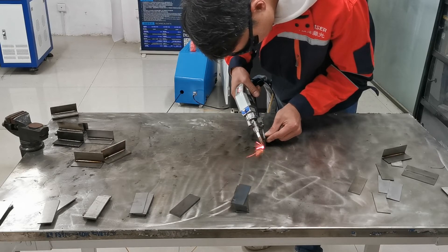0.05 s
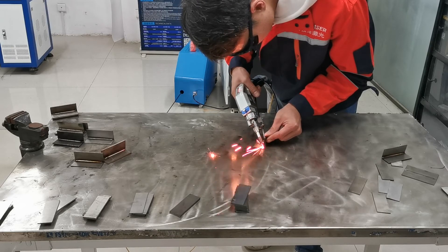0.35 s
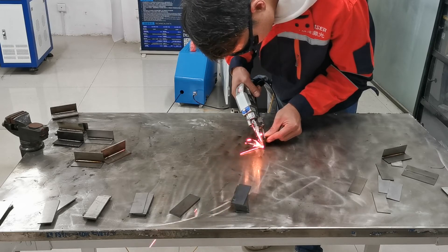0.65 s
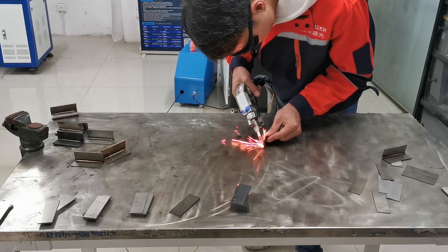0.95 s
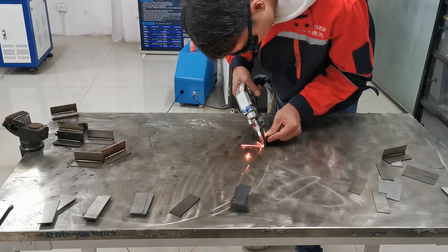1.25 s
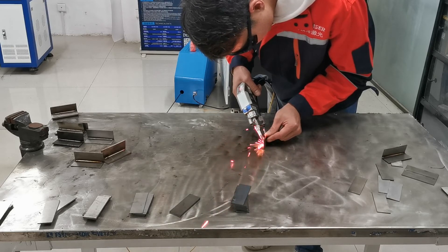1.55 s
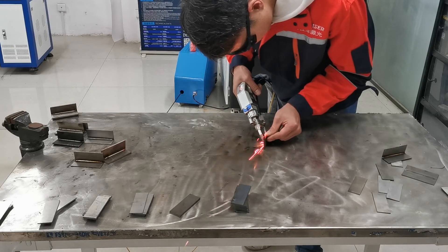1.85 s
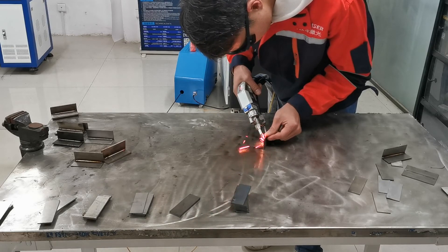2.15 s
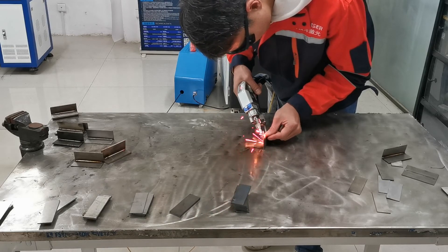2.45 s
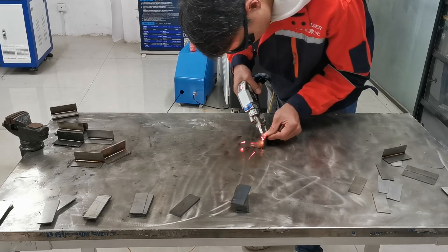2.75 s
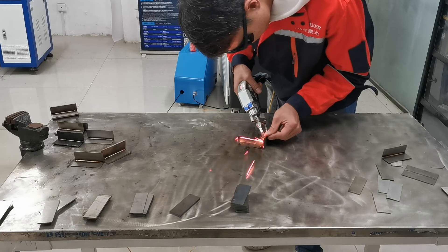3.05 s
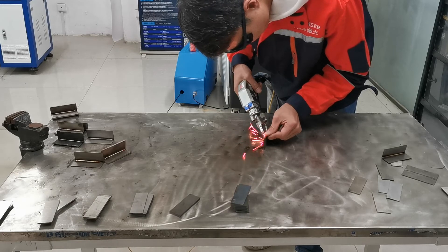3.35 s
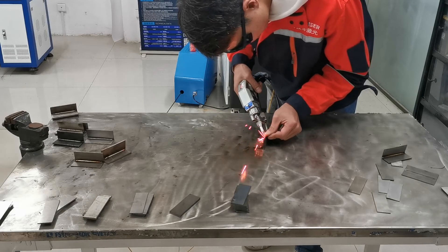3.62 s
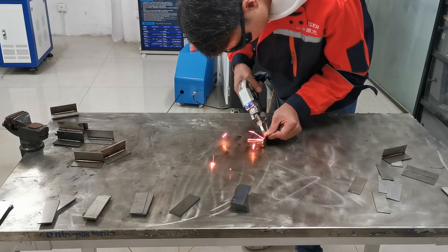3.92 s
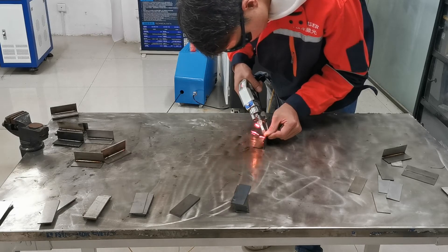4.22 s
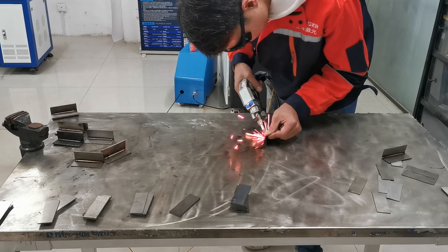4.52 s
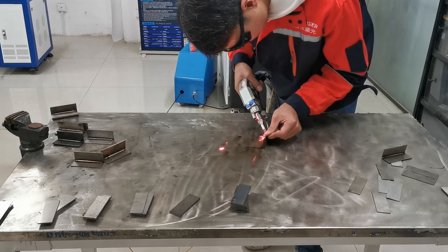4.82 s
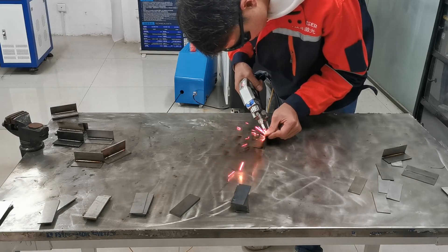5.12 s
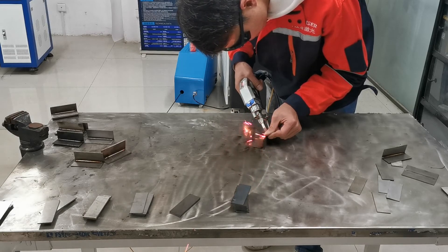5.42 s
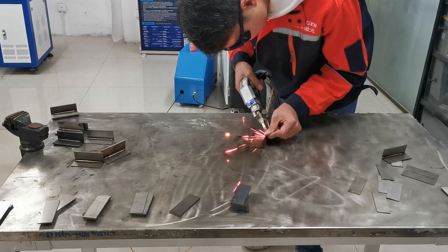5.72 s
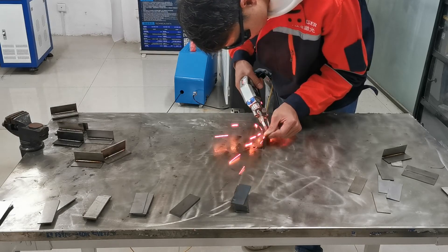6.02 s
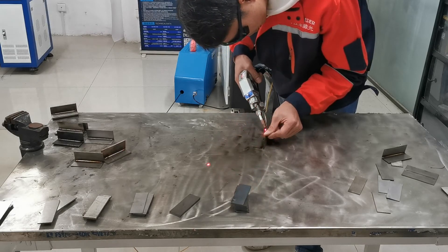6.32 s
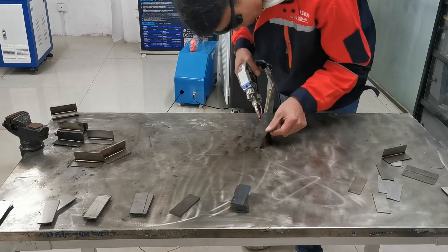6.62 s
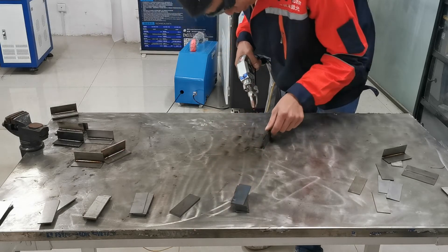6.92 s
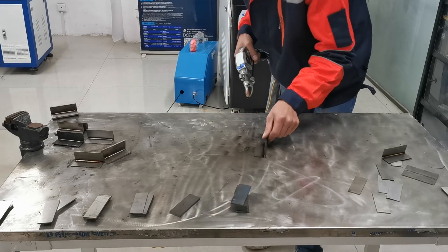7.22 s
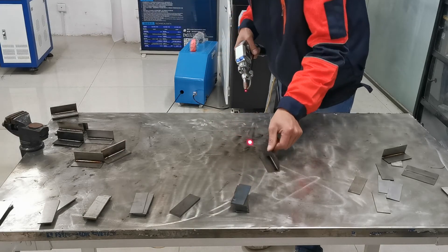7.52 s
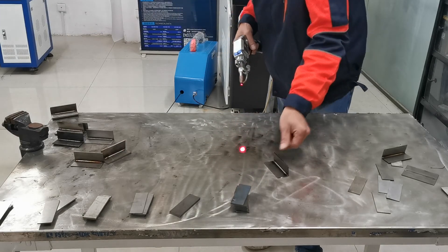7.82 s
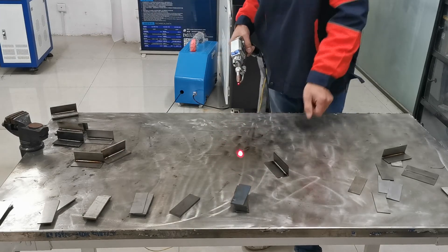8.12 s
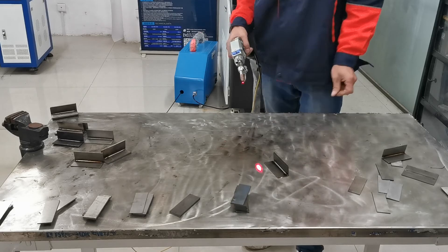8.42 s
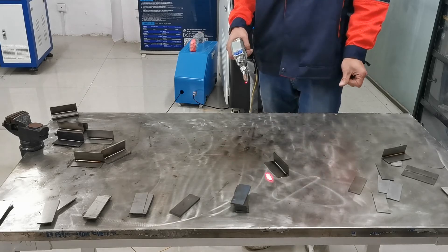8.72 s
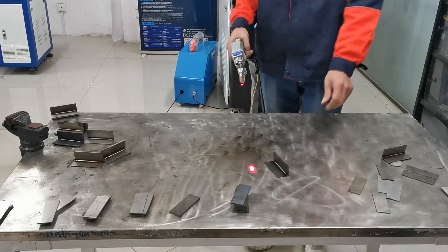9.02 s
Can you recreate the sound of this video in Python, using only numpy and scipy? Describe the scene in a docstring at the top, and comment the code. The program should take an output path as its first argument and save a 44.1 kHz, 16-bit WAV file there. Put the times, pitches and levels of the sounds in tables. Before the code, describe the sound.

Close by in a humming workshop, a laser welding torch gives a bright, rapidly throbbing hiss with a high whine for roughly six seconds. It cuts off with a quick falling chirp, a short breath of gas and a soft scuff. The welded piece scrapes and clinks briefly across a steel bench, then light ticks and faint cloth rustling leave only the hum of machines and fans.

```python
"""Machines hum in a tiled workshop while a handheld laser welder runs a seam on a steel bench.
The beam is pulsed 3000 times a second and swept across the seam: the vapour jet whines, hisses,
throbs and spits. At 5.9 s the beam stops and the whine slides down; shielding gas flows on briefly,
and the torch lifts with a soft scuff and a low rumble. Around 7 s the welded piece is dragged over
the bench, catching and ringing. Last, metal ticks and a sleeve rustles over the hum."""
import sys
import numpy as np
from scipy import signal
from scipy.fft import rfft, irfft, next_fast_len
from scipy.io import wavfile
from scipy.ndimage import uniform_filter1d

SR = 44100
rng = np.random.default_rng(int(sys.argv[2]) if len(sys.argv) > 2 else 0)


def unload_wav(signal):
    """Save mono or channel-first audio to the path in sys.argv[1] as 16-bit WAV at rate SR, clipped to [-1, 1]."""
    wavfile.write(
        sys.argv[1],
        SR,
        np.round(np.clip(np.atleast_2d(signal).T, -1, 1) * 32767).astype(np.int16),
    )


N = 399546
TIME = np.arange(N) / SR
PADDED = next_fast_len(N, True)
BIN_HZ = np.maximum(np.arange(PADDED // 2 + 1) * SR / PADDED, 1)
PULSE_HZ, STOP_S, FALL_HZ_PER_S = 3000, 5.905, 15600   # the beam's pulse rate falls after switch-off

# mains hum and fan tones: (frequency [Hz], level [dB])
HUM_TONES = [(100.3, -51.5), (199.6, -52.5), (297.6, -60.5), (497.6, -63), (687, -65.5), (1067, -71.5),
             (172.6, -67), (563, -69.5), (925, -67)]
# two runs of a motor: (full at [s], held until [s], level [dB])
MOTOR_RUNS = [(1.95, 3.0, -45.5), (6.8, 7.7, -49)]
# tone colour of each noise layer: (frequency [Hz], relative spectral level [dB])
FAN_COLOUR = [(15, -11), (32, 4), (65, -11.5), (160, -9), (280, -14), (370, -16), (560, -15.5),
              (1000, -17.5), (1400, -20), (2300, -22.5), (3500, -35), (8000, -39), (15500, -50)]
RUMBLE_COLOUR = [(20, -7.5), (45, 3), (90, -1), (170, -2.5), (300, -8), (700, -29.5), (2000, -44),
                 (8000, -84)]
SLEEVE_COLOUR = [(1760, -29), (3000, -2), (4060, -10), (4350, -5), (8410, -9.5), (10100, -10), (15500, -17)]
SCUFF_COLOUR = [(120, -25), (280, -3), (680, 1), (900, -6), (3000, -33), (8000, -60)]
GAS_COLOUR = [(300, -16), (1100, -14), (1450, -7), (1680, 2.5), (1950, -7), (2900, -9), (3700, -16.5),
              (6000, -18), (10000, -18.5), (15500, -25)]
DRAG_COLOUR = [(180, -16), (300, -3), (343, -18), (493, -5), (632, -18), (759, -5), (973, -12.5),
               (1230, -6.5), (2800, -7), (3700, -10), (8100, -6), (10000, -10), (11500, -4), (13800, -7),
               (15800, -4.5)]
JET_COLOUR = [(350, -25), (680, -23), (1100, -22.5), (1480, -13.8), (1850, -16.5), (2400, -11.3),
              (3100, -9.5), (3290, -20), (3480, -11), (3750, -13), (4300, -8), (5600, -2), (6900, -3.2),
              (9700, -.8), (10100, -2.5), (10850, 2.5), (11600, -3), (12500, 1.3), (13400, 1),
              (14100, -3.7), (14900, -2), (15800, -10)]
# stereo width of room noise and of close hiss: (frequency [Hz], left-right correlation [-1 to 1])
ROOM_LIKENESS = [(130, 1), (290, 0.82), (640, 0.69), (1410, 0.0)]
CLOSE_LIKENESS = [(640, .98), (1410, 0.625), (3100, 0.49), (6820, 0.033), (15000, -0.01)]
# stereo placement: (frequency [Hz], left over right [dB])
ROOM_PAN = [(60, 9), (110, 2), (200, 6.5), (380, -1), (700, -9.5), (1290, -3), (2380, -4), (4400, 1),
            (8120, -1.5), (15000, -8.5)]
DRAG_PAN = [(200, 3.0), (380, -1), (700, -5), (1290, -3.5), (2380, -8), (4400, 3.5), (8120, -3.5),
            (15000, -11)]
JET_PAN = [(1000, -1.5), (1500, -4.5), (3500, 0.5), (7000, -2), (8000, -1), (9500, -6), (10900, -12.5),
           (11700, -5.5), (13000, -9), (14200, -1), (15800, -7)]

# sleeve swishes: (full at [s], held until [s], level [dB], attack [s], release [s])
SWISHES = [(7.79, 7.92, -67.5, .05, .9), (8.38, 8.48, -67, .6, .25), (8.62, 8.76, -70, .15, .9)]
# light touches of metal: (time [s], level [dB], pitch [Hz], bandwidth [Hz])
TICKS = [(7.795, -63, 3000, 3000), (7.985, -66, 6700, 900), (8.077, -61, 3000, 2600),
         (8.1, -66, 9600, 2000)]
# modes of bench and piece: (frequency [Hz], bandwidth [Hz], relative level [dB])
STEEL_MODES = [(460, 60, -4), (760, 39, 1.5), (900, 90, -2), (1293, 50, 3.5), (1635, 70, -.5),
               (1780, 70, 1), (1810, 830, -7), (2195, 110, -.5), (2480, 130, -2), (2720, 120, -5),
               (4430, 350, -13)]
# fader ride of the drag: (time [s], relative level [dB])
DRAG_EFFORT = [(6.88, -72), (6.954, -56), (7.048, -47), (7.32, -41.5), (7.44, -47.3), (7.52, -55),
               (7.576, -51), (7.696, -70), (7.72, -85)]
# the piece's edge catches: (time [s], knock drive [dB], chatter drive [dB], favoured pitch [Hz])
CATCHES = [(7.021, -39.5, -42.5, 1150), (7.033, -48, -50, 2500), (7.047, -45, -47, 780),
           (7.076, -41.5, -48, 780), (7.088, -38.5, -51, 1720), (7.215, -37.5, -49, 850),
           (7.228, -38.5, -51, 1900), (7.412, -40.5, -47, 900), (7.559, -55, -57.5, 2200)]

# the beam's sweep across the seam: (time [s], rate [Hz])
SWEEP_RATE = [(0, 43.3), (0.6, 44.2), (1.5, 44.4), (2.2, 44.9), (3, 44.63), (4.8, 44.65), (5.4, 44.3),
              (5.9, 43.4)]
# fader ride of the vapour jet's hiss: (time [s], relative level [dB])
JET_LEVEL = [(0.0, -27.7), (0.06, -24.7), (0.71, -25.3), (1.12, -27.1), (1.35, -25.9), (1.44, -28.0),
             (1.77, -27.1), (1.87, -28.9), (1.89, -27.1), (2.2, -25.9), (2.28, -27.1), (2.86, -27.7),
             (3.19, -27.1), (4.81, -28.3), (5.65, -26.5), (5.77, -28.3), (5.9, -26.5)]
# the hiss thins early, then fills out: (time [s], low band gain [dB], middle band gain [dB])
HISS_EQ = [(0, 2.0, 3.5), (.8, 2.0, 3.4), (1.25, .5, 2.4), (2.0, 1.4, 3.2), (3.2, 4.6, 3.9),
           (4.6, 4.9, 3.6), (5.4, 6.0, 3.9), (5.9, 6.6, 3.3)]
# tremolo that the sweep gives the hiss: (time [s], depth [0-1])
HISS_THROB = [(0, .03), (.85, .35), (2.8, .35), (4.5, .16), (5.2, .27), (5.9, .05)]
# reflections off hand, torch, chest and floor: (delay [s], gain [ratio], delay wander [s])
NEAR_ECHOES = [(.00075, .18, .00007), (.0013, .2, .00008), (.0047, .22, .00006), (.0083, .22, .00008)]
# nozzle gap resonances: (frequency [Hz], bandwidth [Hz], boost [dB], crest time [s], half width [s])
NOZZLE_MODES = [(10920, 520, 6.5, .5, 1.0), (12850, 170, 4.5, .3, .9), (13170, 280, 5, 2.5, 1.0),
                (10800, 700, 5.5, 2.7, .7), (7570, 230, 4.5, 4.9, .9), (10750, 700, 3.5, 4.6, 1.2),
                (4150, 700, 3.5, 1.9, 1.6)]
# whine harmonics along the seam: (time [s], relative level [dB], left over right [dB], left lead [rad])
WHINE_3K = [(0.0, -27.1, -1.8, -0.8), (0.1, -40.1, -4.8, -0.4), (0.9, -37.0, -5.1, 0.3),
            (1.1, -34.0, -4.9, 0.2), (1.4, -39.6, -0.9, 0.4), (1.6, -37.6, -1.1, 0.3),
            (2.0, -40.0, -1.3, 0.1), (2.4, -38.9, -3.4, -0.8), (3.4, -34.9, -7.4, -2.6),
            (4.0, -38.9, -5.7, -2.0), (5.5, -41.2, -3.3, -0.3), (5.9, -34.5, -4.5, 0.4)]
WHINE_6K = [(0.0, -29.2, 1.0, -0.1), (0.2, -26.3, 4.3, 0.0), (0.8, -30.2, 3.4, 0.3), (1.3, -29.3, 4.5, 0.2),
            (1.8, -34.3, 5.0, 0.9), (2.6, -37.1, 0.0, 0.1), (2.9, -42.7, -2.3, 0.3),
            (3.2, -33.7, -4.1, 0.2), (3.7, -32.1, 1.4, 0.8), (4.5, -36.2, -4.1, -0.5),
            (4.9, -36.3, -12.0, -1.4), (5.9, -29.8, -4.5, -0.1)]
WHINE_9K = [(0.0, -27.0, -10.2, -1.3), (0.1, -22.8, -11.0, -1.3), (1.1, -28.6, -6.2, -1.7),
            (1.3, -24.0, -8.9, -1.7), (1.4, -28.7, -3.8, -1.7), (2.2, -22.9, -9.9, -1.1),
            (2.3, -28.9, -6.0, -1.4), (3.05, -28.2, -7.2, -1.8), (3.5, -27.4, -6.2, -1.0),
            (3.8, -29.7, -4.6, 0.1), (4.4, -29.8, -4.3, 1.8), (4.8, -31.2, -5.0, 4.2),
            (5.6, -29.4, -1.7, 5.2), (5.8, -34.5, -7.4, 5.2), (5.9, -29.2, -6.6, 5.6)]
WHINE_12K = [(0.0, -34.4, -4.7, -1.9), (0.1, -29.4, -4.4, -1.9), (0.7, -27.8, -9.0, -1.9),
             (1.2, -35.2, -8.3, -1.9), (1.3, -31.6, -11.2, -1.5), (1.9, -38.2, -9.4, -0.7),
             (2.4, -35.8, -5.6, -0.5), (2.8, -38.1, -1.5, -1.2), (3.7, -33.7, -8.5, -1.2),
             (4.7, -40.0, 5.0, -1.9), (4.9, -32.4, -4.4, -1.9), (5.3, -25.8, -10.3, -1.9),
             (5.9, -28.9, -12.0, -1.9)]
WHINE_15K = [(0.0, -35.5, -2.5, -1.6), (0.2, -38.8, -2.8, -1.6), (0.9, -37.9, -7.7, -1.2),
             (1.4, -37.9, -2.2, -1.6), (1.8, -40.4, -5.3, -2.0), (2.0, -36.9, -2.6, -2.2),
             (3.3, -40.3, -3.0, -2.2), (3.5, -34.7, -5.8, -2.0), (4.9, -37.8, -3.6, -1.4),
             (5.7, -34.0, -7.6, -2.0), (5.9, -42.4, -6.0, -1.5)]
# how the sweep shakes harmonics 1 to 5:
# (throb depth [0-1], deepest at [s], half width [s], lag [rad], phase swing [rad], sputter [0-1])
WHINE_MOTION = [(.87, .8, 3.3, 4.1, .75, .2), (.85, 3.5, 1.1, 1.1, .45, .1), (.7, 1.9, 1.6, 1.6, .55, .1),
                (.45, 3.0, 2.2, .8, .6, .1), (.35, 2.5, 2.8, .8, .95, .1)]
# falling chirp and lingering whine, a row per harmonic: (relative level at switch-off [dB], fade [dB/s])
CHIRP_FADES = [(-23, 135), (-21, 380)]
LINGER_FADES = [(-46, 105), (-35.5, 135), (-38.5, 155)]


def from_db(db):
    """Decibels to gain."""
    return 10 ** (np.asarray(db) / 20)


def rms_one(x):
    """Scale to unit power."""
    return x / np.sqrt(np.mean(x ** 2) + 1e-20)


def to_bins(x):
    """Sound to spectrum."""
    return rfft(x, PADDED)


def to_sound(spectrum):
    """Spectrum to sound."""
    return irfft(spectrum, PADDED)[..., :N]


def in_time(rows):
    """Each column of an automation curve at every sample."""
    times, *columns = np.transpose(rows)
    return [np.interp(TIME, times, column) for column in columns]


def at_hz(points):
    """A spectrum table at every frequency bin."""
    hz, values = np.transpose(points)
    return np.interp(np.log(BIN_HZ), np.log(hz), values)


def during(start, end, fade_s):
    """A gate, open between two times, with straight fades outside them."""
    return np.clip(np.minimum(TIME - start, end - TIME) / fade_s + 1, 0, 1)


def envelope(start, end, db, attack_s, release_s):
    """A held level that rises 20 dB per attack time and falls 20 dB per release time."""
    outside = np.maximum(start - TIME, 0) / attack_s + np.maximum(TIME - end, 0) / release_s
    return from_db(db - 20 * np.minimum(outside, 10))


def hit(start, db, decay_s):
    """A percussive envelope: instant attack, exponential decay."""
    return from_db(db) * np.exp(-np.abs(TIME - start) / decay_s) * (TIME >= start)


def since_stop():
    """Seconds since switch-off, counted only through the beam's short run-down."""
    return np.clip(TIME - STOP_S, 0, .15)


def drift(hz):
    """A smooth random modulator of rms 1, moving mostly slower than hz."""
    step = 18
    count = next_fast_len(N // step + 2, True)
    rates = np.arange(count // 2 + 1) * SR / (step * count)
    slow = irfft(rfft(rng.standard_normal(count)) / (1 + (rates / hz) ** 2), count)
    return np.interp(TIME, np.arange(count) * step / SR, rms_one(slow))


def rough_tone(phase, rough, width_hz):
    """A tone frayed by a narrow skirt of noise."""
    return (1 + rough * drift(width_hz)) * np.cos(phase) + rough * drift(width_hz) * np.sin(phase)


def grains(per_s, spread_db):
    """Random stereo clicks of uneven size; rms 1."""
    sizes = from_db(spread_db * np.minimum(rng.exponential(1, N), 5))
    return rms_one((rng.random(N) < per_s / SR) * sizes * rng.standard_normal((2, N)))


def resonance(x, hz, width_hz):
    """One resonant band, with gain 1 at its peak."""
    return signal.lfilter(*signal.iirpeak(hz, hz / width_hz, fs=SR), x + 1e-18)


def panned(db):
    """Equal-power pan gains; positive is left."""
    gains = from_db(np.array([db, -db]).reshape(2, -1) / 2)
    return gains / np.sqrt(np.mean(gains ** 2, axis=0))


def coloured(pair, colour, likeness, pan):
    """Two unrelated signals become mid and side with a given colour, width and placement; rms 1."""
    mid, side = to_bins(pair) * from_db(at_hz(colour))
    alike = np.clip(at_hz(likeness), -.99, .99)
    stereo = np.sqrt(1 + alike) * mid + np.sqrt(1 - alike) * side * [[1], [-1]]
    return rms_one(to_sound(stereo * panned(at_hz(pan))))


def room_noise(colour):
    """Smooth noise spread through the workshop."""
    return coloured(rng.standard_normal((2, N)), colour, ROOM_LIKENESS, ROOM_PAN)


def workshop(x, wet_db, t60, dull_hz):
    """Direct sound plus a diffuse reverb tail whose treble dies sooner."""
    t = TIME[:SR]
    noise = rng.standard_normal((2, SR)) * (t > .004)
    low = signal.sosfilt(signal.butter(2, dull_hz, fs=SR, output="sos"), noise)
    tail = low * 1000 ** (-t / t60) + (noise - low) * 1000 ** (-t / (.3 * t60))
    tail /= np.sqrt(np.sum(tail ** 2, axis=1, keepdims=True))
    return x + from_db(wet_db) * signal.fftconvolve(x, tail, axes=1)[:, :N]


def machines():
    """The bed: transformer hum, fan noise and a motor that drones twice."""
    hum = sum(from_db(db) * (1 + .14 * drift(hz=4)) * np.sin(2 * np.pi * (hz * TIME + rng.random()))
              for hz, db in HUM_TONES)
    running = sum(envelope(*run, attack_s=.35, release_s=.25) for run in MOTOR_RUNS)
    drone = running * np.sin(2 * np.pi * 55.8 * TIME + .3 * drift(hz=3))
    fans = from_db(-51.5) * room_noise(FAN_COLOUR)
    return np.sqrt(2) * (hum * panned(2.8) + drone * panned(5.0)) + fans


def rumble():
    """A faint low rumble swells while the worker straightens up."""
    swell = envelope(6.28, 6.95, db=-55, attack_s=.5, release_s=1.1)
    return (from_db(-65) + swell) * room_noise(RUMBLE_COLOUR)


def sleeve():
    """Cloth rustles in three overlapping, airy swishes."""
    swishes = np.sqrt(sum(envelope(*swish) ** 2 for swish in SWISHES))
    return swishes * from_db(.6 * drift(hz=12)) * room_noise(SLEEVE_COLOUR)


def ticks():
    """After the piece is let go, each light touch of metal rings briefly in one band."""
    noise = rng.standard_normal((2, N))
    narrowed = noise + .5 * noise[::-1]
    touches = sum(rms_one(resonance(narrowed, hz, width_hz)) * hit(start, db, decay_s=.014)
                  for start, db, hz, width_hz in TICKS)
    return workshop(touches, wet_db=-8, t60=.5, dull_hz=5000)


def scuff():
    """A soft, dull scuff as the torch lifts."""
    return envelope(6.27, 6.28, db=-50, attack_s=.05, release_s=.36) * room_noise(SCUFF_COLOUR)


def shielding_gas():
    """Gas breathes on after the beam stops, until its valve shuts."""
    flow = envelope(6.05, 6.06, db=-37, attack_s=.09, release_s=.35)
    valve_open = during(STOP_S, 6.3, fade_s=.1)
    return flow * valve_open * room_noise(GAS_COLOUR)


def steel(force):
    """Bench and piece ring in their modes, through a response of unit mean power."""
    response = sum((-1) ** k * from_db(db) / (1 + 2j * (BIN_HZ - hz) / width_hz)
                   for k, (hz, width_hz, db) in enumerate(STEEL_MODES))
    return to_sound(to_bins(force) * rms_one(np.abs(response)) * np.exp(1j * np.angle(response)))


def drag():
    """Tiny slips and the catches of the edge shake the steel, under the hiss of sliding."""
    effort = from_db(in_time(DRAG_EFFORT)[0])
    slips, crunch = grains(per_s=1100, spread_db=4), rng.standard_normal((2, N))
    force = slips * from_db(-9) * effort
    for start, knock_db, chatter_db, hz in CATCHES:
        catch = crunch * hit(start, knock_db, decay_s=.008) + slips * hit(start, chatter_db, decay_s=.03)
        force += .5 * catch + 1.1 * resonance(catch, hz, width_hz=550)
    grating = steel(force + .5 * force[::-1]) * panned(-4.1)
    grit = grains(per_s=14000, spread_db=1)
    sliding = coloured(grit, DRAG_COLOUR, CLOSE_LIKENESS, DRAG_PAN) * from_db(5.3) * effort
    scrape = (grating + sliding) * during(6.92, 7.64, fade_s=.08)
    return workshop(scrape, wet_db=-7.5, t60=.67, dull_hz=4000)


def bench_echo(x, delay_s, share, dull_hz):
    """A close, dull reflection hollows the lower part of the hiss."""
    echo = share / (1 + (BIN_HZ / dull_hz) ** 8) * np.exp(-2j * np.pi * BIN_HZ * delay_s)
    return to_sound(to_bins(x) * (1 - echo))


def near_echoes(x, wander_hz):
    """Close reflections move with the hand and gently flange the hiss; rms 1."""
    out = x
    for delay_s, share, wander_s in NEAR_ECHOES:
        earlier = TIME - delay_s - wander_s * drift(wander_hz)
        out = out + share * np.array([np.interp(earlier, TIME, side, left=0) for side in x])
    return rms_one(out)


def nozzle(x):
    """The gap under the nozzle changes as the torch travels, so its resonances swell and sink in turn."""
    spectrum, out = to_bins(x), x
    for hz, width_hz, db, crest_s, half_s in NOZZLE_MODES:
        band = to_sound(spectrum / (1 + (2 * (BIN_HZ - hz) / width_hz) ** 4))
        boost = from_db(db * np.exp(-((TIME - crest_s) / half_s) ** 2))
        out = out + band * (boost - 1)
    return out


def spits(per_s, decay_s):
    """Droplets burst from the melt: sudden flares that die in a moment; mean 1."""
    bursts = (rng.random(N) < per_s / SR) * rng.uniform(.3, 1.5, N)
    flares = signal.lfilter([1], [1, -np.exp(-1 / (decay_s * SR))], bursts + 1e-18)
    return flares / np.mean(flares)


def hiss_bands(jet):
    """A moving three-band EQ: middle and top waver separately, and the top dies first at switch-off."""
    spectrum = to_bins(jet)
    low = to_sound(spectrum / (1 + (BIN_HZ / 2800) ** 8))
    top = to_sound(spectrum / (1 + (9500 / BIN_HZ) ** 8))
    low_db, middle_db = in_time(HISS_EQ)
    middle_db += .35 * drift(hz=5)
    top_db = 3 + .7 * drift(hz=5) - 100 * since_stop()
    return low * from_db(low_db) + (jet - low - top) * from_db(middle_db) + top * from_db(top_db)


def hiss(pulse, sweep):
    """Each laser pulse blows a puff of vapour; the jet flares with each sweep and each droplet."""
    puffs = rng.standard_normal((2, N)) * (1 + .42 * np.cos(pulse))
    puffs *= np.sqrt(1 + .2 * spits(per_s=360, decay_s=.0015))
    turn = sweep + .35
    flare = np.sin(turn) + .28 * np.sin(2 * turn) + .17 * np.sin(3 * turn)
    throb = 1 + in_time(HISS_THROB)[0] * flare
    jet = coloured(puffs * throb, JET_COLOUR, CLOSE_LIKENESS, JET_PAN)
    jet = bench_echo(jet, delay_s=.00215, share=.3, dull_hz=4200)
    jet = near_echoes(jet, wander_hz=.7)
    jet = hiss_bands(nozzle(jet))
    flicker_db = .45 * drift(hz=14)   # the jet burns unevenly
    return jet * from_db(in_time(JET_LEVEL)[0] + flicker_db) * during(0, 5.94, fade_s=.13)


def linger():
    """The whine's first three harmonics hang in the room for a moment."""
    after_s = np.maximum(TIME - STOP_S, 0)
    tones = 0
    for harmonic, (db, fade_db_per_s) in enumerate(LINGER_FADES, 1):
        level = from_db(db - fade_db_per_s * after_s) * (1 + .25 * drift(hz=30))
        cycles = harmonic * PULSE_HZ * TIME + rng.random((2, 1)) / 4
        tones += level * np.cos(2 * np.pi * cycles)
    return np.sqrt(2) * tones * during(STOP_S, TIME[-1], fade_s=.02)


def dying_chirp(pulse):
    """As the beam dies the whine slides down in a rough chirp that sets the room ringing."""
    chirp = 0
    for harmonic, (db, fade_db_per_s) in enumerate(CHIRP_FADES, 1):
        tone = rough_tone(harmonic * pulse, rough=.6, width_hz=220)
        chirp += from_db(db - fade_db_per_s * since_stop()) * tone
    chirp *= during(5.93, 6.005, fade_s=.02)
    return workshop(chirp * panned(-7), wet_db=-6, t60=.35, dull_hz=7000)


def whine(pulse, sweep):
    """Harmonics of the pulsed jet: the sweep swings level and phase, the melt pool makes them sputter."""
    out = np.zeros((2, N))
    for k, ride in enumerate((WHINE_3K, WHINE_6K, WHINE_9K, WHINE_12K, WHINE_15K)):
        db, pan_db, left_lead = in_time(ride)
        depth, deepest_s, half_s, lag, swing_rad, sputter = WHINE_MOTION[k]
        turn = sweep - lag
        throb = depth / (1 + ((TIME - deepest_s) / half_s) ** 2)
        uneven = sputter * (drift(hz=4) * np.cos(2 * turn) + drift(hz=4) * np.sin(3 * turn))
        tremolo = (1 + throb * np.cos(turn) + uneven) / np.sqrt(1 + throb ** 2 / 2 + sputter ** 2)
        swing = np.cos(turn + .6) + .3 * np.sin(2 * turn) + .2 * np.sin(3 * turn)   # leads the throb
        phase = (k + 1) * pulse + swing_rad * swing + left_lead * np.array([[1], [0]])
        tone = rough_tone(phase, rough=.14, width_hz=130)
        out += np.sqrt(2) * from_db(db) * tremolo * panned(pan_db) * tone
    return out * during(0, 5.895, fade_s=.018)


def weld():
    """The lead sound: whine and hiss locked to the same laser pulses and the same sweep."""
    pulse = 2 * np.pi * np.cumsum(PULSE_HZ - FALL_HZ_PER_S * since_stop()) / SR
    sweep = 2 * np.pi * np.cumsum(in_time(SWEEP_RATE)[0]) / SR
    jet_tones, jet_noise = whine(pulse, sweep), hiss(pulse, sweep)
    tones = workshop(jet_tones, wet_db=-16, t60=.6, dull_hz=7000)
    noise = workshop(jet_noise, wet_db=-8, t60=.45, dull_hz=5000)
    return from_db(6.1) * (tones + noise + dying_chirp(pulse) + linger())


def scene():
    """The mix: the weld, the handling after it and the workshop bed."""
    soft_layers = shielding_gas() + scuff() + sleeve() + rumble()
    return soft_layers + weld() + drag() + ticks() + machines()


def gain_control(x, threshold_db, depth_db, release_db_per_s):
    """Loud sound ducks the gain by a limited amount; it climbs back in the quiet."""
    power = uniform_filter1d(np.mean(x ** 2, axis=0), size=900)
    level_db = 10 * np.log10(np.maximum(power, 1e-12))
    cut_db = np.clip(level_db - threshold_db, 0, depth_db)
    held_db = np.maximum.accumulate(cut_db + release_db_per_s * TIME) - release_db_per_s * TIME
    return x * from_db(-held_db)


def record(dry):
    """The master chain: gain control, then a steep high cut at 15.8 kHz."""
    even = gain_control(dry, threshold_db=-29, depth_db=9.5, release_db_per_s=38)
    return to_sound(to_bins(even) / np.sqrt(1 + (BIN_HZ / 15800) ** 800))


dry = scene()
out = record(dry)
unload_wav(out)
```